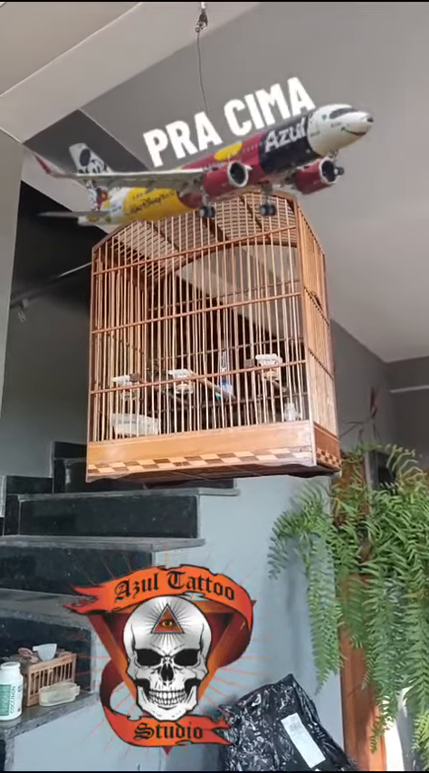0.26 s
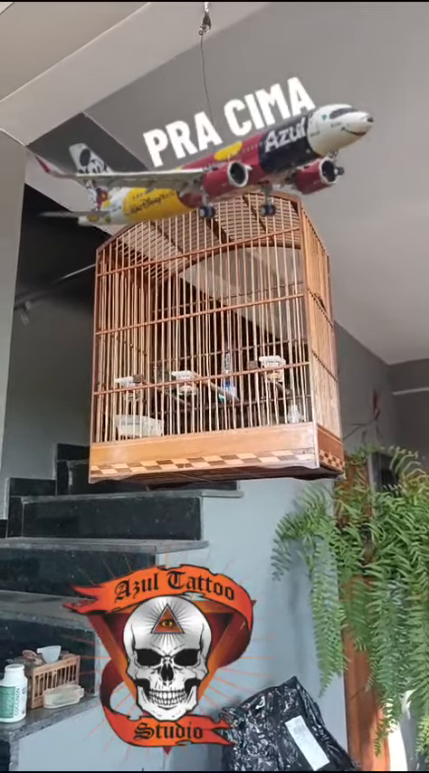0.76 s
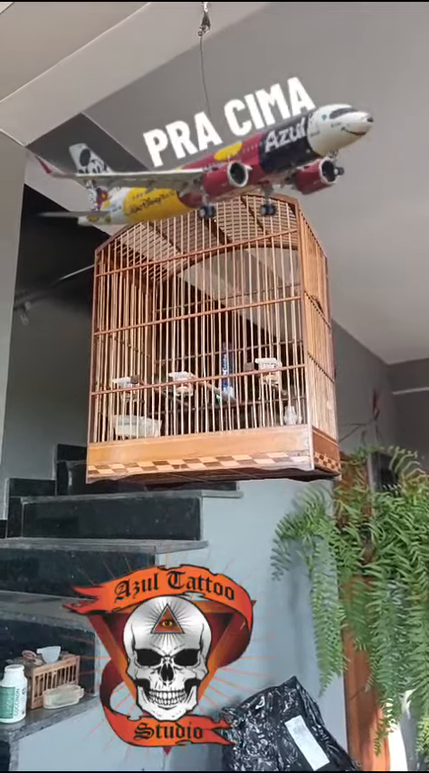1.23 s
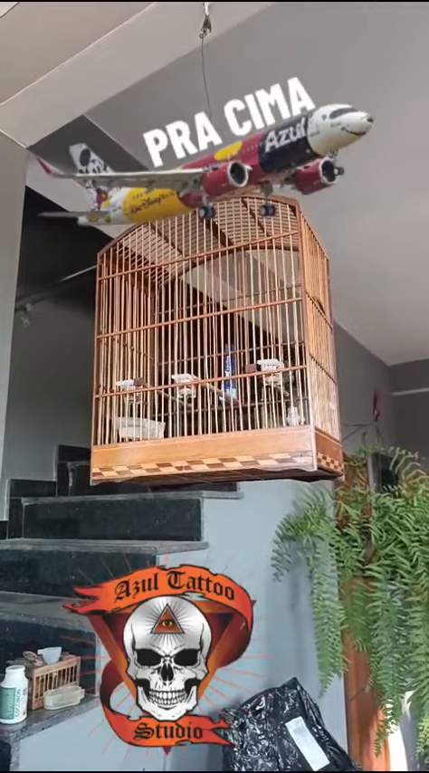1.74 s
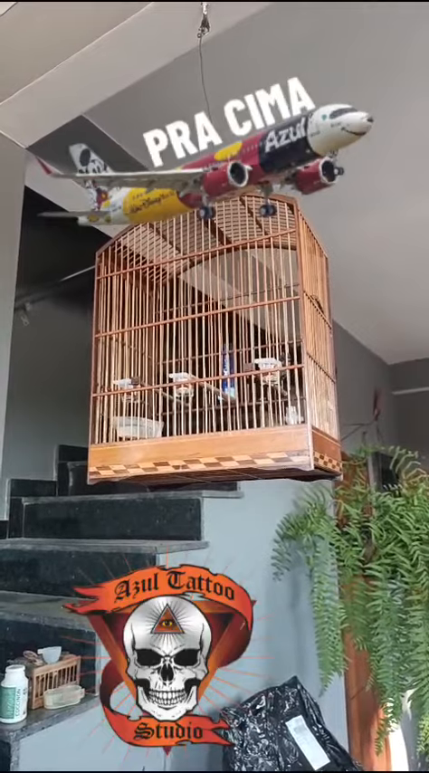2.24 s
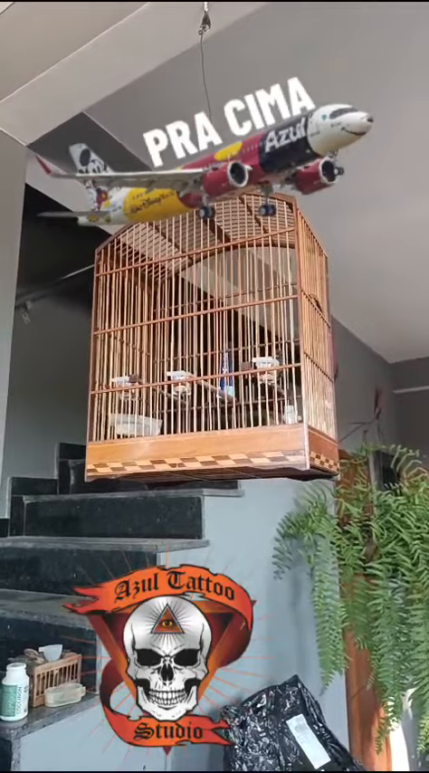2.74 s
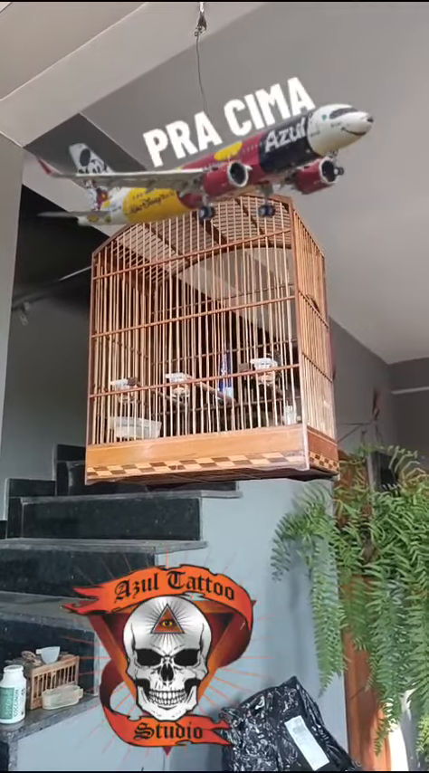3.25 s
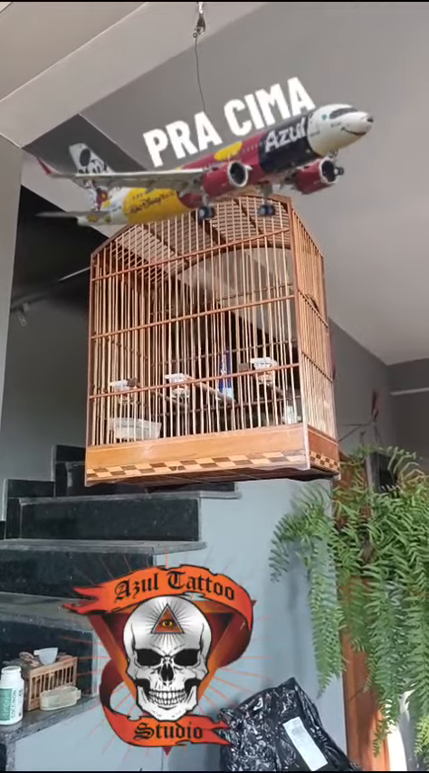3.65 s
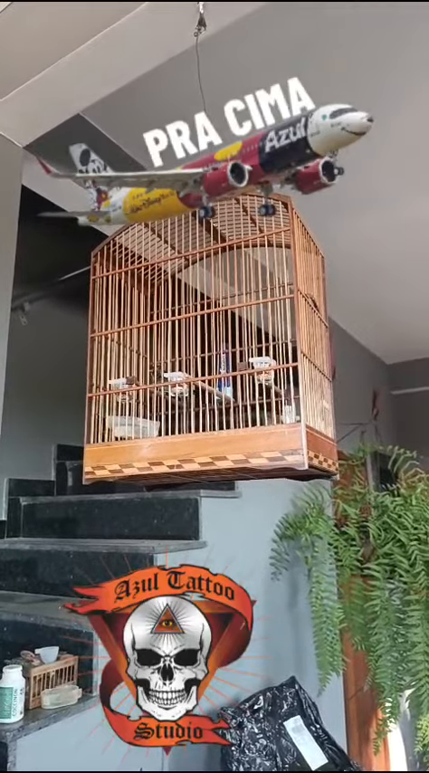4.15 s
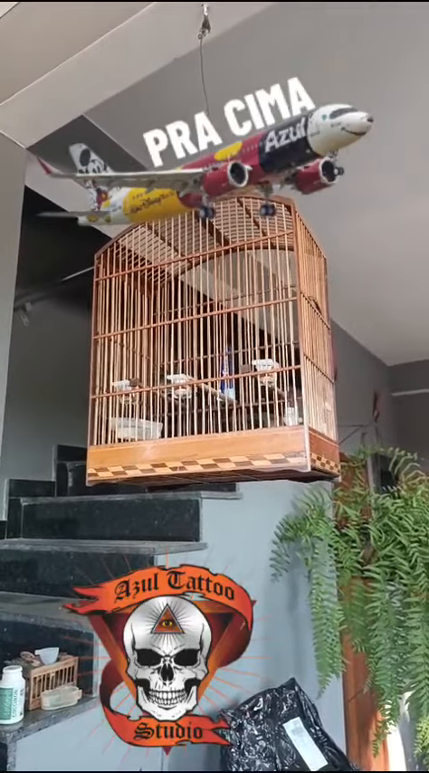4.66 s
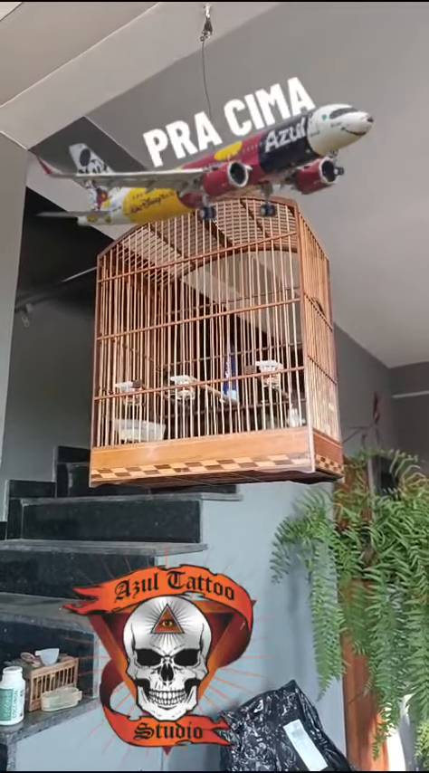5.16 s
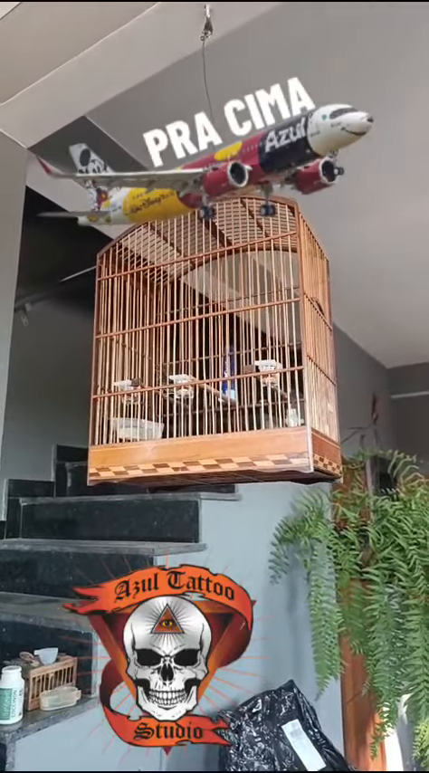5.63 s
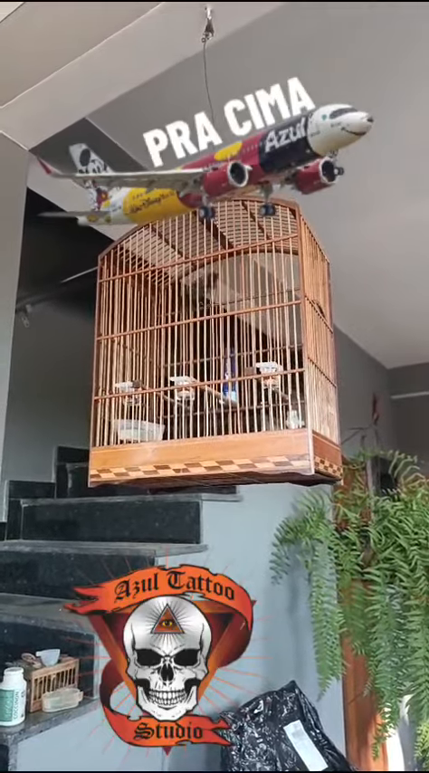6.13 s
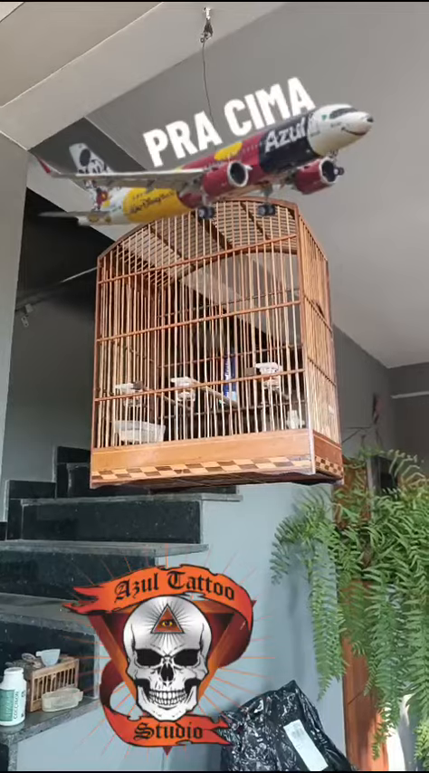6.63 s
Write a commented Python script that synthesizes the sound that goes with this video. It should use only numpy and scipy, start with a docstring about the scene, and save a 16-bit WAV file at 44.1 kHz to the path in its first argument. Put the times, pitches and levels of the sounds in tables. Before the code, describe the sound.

Indoors, a bird sings a high song three times, each ending in a quick pitch drop, with distant birds and low traffic behind.

```python
"""Caged bird in a hard room

A small bird sings three times: thin pips, quickening down-flicks, then a buzz of fast pitch sweeps that
narrows to a whistle and drops an octave, all from one nearly pure, gliding voice. The hard walls ring,
and an earlier song is still fading at the start. Other birds answer from further off, the cage ticks
as the bird hops, and outside the traffic hums with rumble, tyre wash and engine drones."""
import sys
import numpy as np
from scipy import signal
from scipy.fft import rfft, irfft, next_fast_len
from scipy.io import wavfile
from scipy.ndimage import map_coordinates

SR = 44100
rng = np.random.default_rng(int(sys.argv[2]) if len(sys.argv) > 2 else 0)


def to_wav(sig):
    """Store sig (one row per channel, or 1-D mono) as 16-bit WAV at the path in sys.argv[1].

    Samples outside -1..1 are clipped; the rate is SR.
    """
    pcm = np.clip(np.atleast_2d(sig), -1, 1) * 32767
    pcm = np.round(pcm).astype(np.int16)
    wavfile.write(sys.argv[1], SR, pcm.T)  # frames by channels


N = 303849

# fader moves of the traffic bed: (time [s], relative rumble level [dB], relative wash level [dB])
TRAFFIC_LEVELS = [(0.0, -49, -52), (0.5, -47.5, -55.5), (1.73, -54.5, -52.5), (2.09, -59, -54.5),
                  (3.07, -57, -56), (4.24, -54, -56.5), (4.81, -50, -53), (5.68, -55.5, -52.5),
                  (5.99, -52, -52.5), (6.89, -55, -49.5)]
# EQ of the traffic rumble and of the tyre wash: (frequency [Hz], gain [dB])
RUMBLE_EQ = [(25, -51.5), (38, -31), (48, -20), (60, -2.5), (75, -2.5), (110, 5), (175, 1), (240, -20),
             (400, -8.5), (700, -56)]
WASH_EQ = [(40, -6), (200, 10.5), (450, 3.5), (650, 3), (900, -3), (1600, -2.5), (2400, -6), (3500, -13),
           (5000, -22), (8000, -26.5), (12000, -34), (16000, -43.5)]
# engines: (start [s], end [s], first firing rate [Hz], last firing rate [Hz], level [dB])
ENGINES = [(-.5, 2.2, 68.46, 65.97, -47), (.7, 2.1, 57.5, 55, -57), (5.6, 7.2, 57.95, 60.5, -52.5)]
# harmonics of an engine: (multiple of the firing rate, level [dB])
ENGINE_HARMONICS = [(2, -2), (3, -5.5), (4, -14), (7, -17.5)]
# ring of the room: (frequency [Hz], time to fall 60 dB [s])
ROOM_DECAY = [(2000, 0.78), (4500, 0.7), (7500, 0.58), (10000, 0.4), (15000, 0.4)]
# first reflections off ceiling and walls: (delay [s], level [dB])
REFLECTIONS = [(.0045, -9.5), (0.0141, -4.5), (0.029, -5.5), (.056, -24)]
# strength of the straight path from the beak: (frequency [Hz], gain [dB])
BEAK_EQ = [(6000, -2.5), (8000, 1.5), (9500, 1.5), (15000, -2.5)]
# how each microphone hears birds and cage: (frequency [Hz], left gain [dB], right gain [dB])
MIC_EQ = [(2913, 1, 0.5), (4400, -2, 1.5), (6600, -4, 0.5), (7700, -7.5, 1), (9060, -7, 0.5),
          (12400, -5, -11), (13400, -2, -16), (14000, 11, 8), (15100, 5, 1.5)]
# feet and wings on the cage: (time [s], level [dB])
CAGE_TAPS = [(0.534, -63), (1.004, -59), (1.219, -76), (1.655, -43.5), (3.484, -44.5), (3.598, -44),
             (3.752, -41.5), (5.939, -53), (6.702, -46)]
# EQ of one tick: (frequency [Hz], gain [dB])
TICK_EQ = [(300, -7.5), (1500, 6), (4000, 4), (8000, -6), (15000, -8)]
# a far bird's chirps, all on one pitch: (time [s], level [dB])
FAR_CHIRPS = [(1.491, -60.5), (2.56, -52), (3.048, -54), (3.491, -52), (4.422, -51.5)]
# thin far whistles: (time [s], length [s], start pitch [Hz], end pitch [Hz], level [dB])
FAR_WHISTLES = [(2.995, 0.077, 5530, 4960, -55), (3.211, 0.1, 4050, 4510, -58),
                (3.327, 0.08, 4520, 4365, -54.5), (3.55, 0.05, 3710, 4150, -50),
                (4.333, 0.059, 4050, 3980, -42.5), (4.963, 0.047, 6540, 5010, -51)]
# far flourishes: (time of the drop [s], level [dB], time stretch [ratio], pitch [ratio])
FAR_SONGS = [(.605, -55.5, 1.13, 0.99), (1.432, -35, 1.4, 0.94), (4.234, -35.5, 1.3, 0.91),
             (4.766, -57, 0.92, 0.78)]
# U-shaped pips: (time [s], relative level [dB], lowest pitch [Hz], length [s])
PIPS = [(0.6995, -35, 9400, 0.012), (0.8698, -31, 9570, 0.022), (0.997, -36, 9490, 0.022),
        (1.141, -27.5, 9520, 0.016), (1.2164, -26.5, 9650, 0.02), (1.2944, -29.5, 9380, 0.02),
        (1.3668, -23.5, 9480, 0.0087), (1.457, -36.5, 8940, 0.019), (2.6996, -30.5, 9310, 0.0083),
        (2.9528, -29.5, 9530, 0.013), (3.0753, -27, 9640, 0.013), (3.2424, -29, 9490, 0.018),
        (3.401, -33.5, 9260, 0.015), (3.481, -37.5, 9050, 0.014), (5.098, -41, 9160, 0.0138),
        (5.3184, -36, 9450, 0.019), (5.422, -30, 9660, 0.015), (5.564, -31, 9660, 0.019),
        (5.671, -28, 9560, 0.014), (5.7935, -31.5, 9450, 0.014), (5.871, -32, 9430, 0.014)]
# a lone low flick under a pip: (time [s], level [dB])
LOW_FLICKS = [(0.999, -37.5), (3.074, -44.5)]
# runs of flicks: (start [s], end [s], first gap [s], gap over the one before [ratio], relative level [dB])
FLICK_RUNS = [(1.509, 1.78, .0535, .905, -33), (3.526, 3.71, .0475, .92, -31),
              (5.927, 6.16, .045, .975, -33.5)]
# three high flicks leading into the buzz: (time [s], level of the first [dB])
LEAD_INS = [(1.784, -21.5), (3.756, -25), (6.192, -25.5)]
# near flourishes: (time of the drop [s], level [dB], overtone level [dB], boost of the drop [dB])
NEAR_SONGS = [(-.032, -23, -15, 3.5), (1.976, -19.5, -14, 2.5), (3.952, -19, -15, 3),
              (6.386, -19.5, -15.5, 2)]

# the near bird's flourish (buzz, whistle, short shelf, plunge); far birds stretch and transpose it
BUZZ_CENTRE_HZ, BUZZ_DEPTH_HZ, SWEEPS_PER_S = 8250, 1510, 192.5
WHISTLE_HZ, WHISTLE_SAG_HZ_PER_S = 7750, 3000
SHELF_HZ, SHELF_RISE_HZ, PLUNGE_END_HZ, PLUNGE_CURVE = 6400, 550, 3800, .75
BUZZ_S, NARROW_S, WHISTLE_S, STEP_S, SHELF_S, PLUNGE_S = .114, .024, .062, .003, .014, .031
ATTACK_S, RELEASE_S, SWELL_DB_PER_S, SHELF_DB = .03, .015, 7.5, -2

FLICK_S, FLICK_TOP_HZ, FLICK_BOTTOM_HZ = .008, 10900, 8600
PRE_ROLL = SR // 2  # samples, so sounds can begin before time zero
TIME = np.arange(-PRE_ROLL, N + SR) / SR


def undb(db):
    """Decibels to gain."""
    return 10 ** (np.asarray(db) / 20)


def unit(x):
    """Scale to rms 1."""
    return x / np.sqrt(np.mean(x ** 2))


def eq(x, points):
    """Filter by (frequency [Hz], gain [dB]) points joined on a log axis."""
    hz, db = np.transpose(points)
    size = next_fast_len(x.shape[-1])
    f = np.maximum(np.fft.rfftfreq(size, 1 / SR), 1)
    gain = undb(np.interp(np.log(f), np.log(hz), db))
    return irfft(rfft(x, size) * gain, size)[..., :x.shape[-1]]


def wander(t, rate):
    """Smooth random modulation with a spread near 1."""
    return map_coordinates(rng.standard_normal(4096), [(t - t[0]) * rate], order=3, mode="wrap")


def ramp(t, start, length):
    """Rise from 0 to 1 over the given length."""
    return np.clip((t - start) / length, 0, 1)


def add(track, s, sound):
    """Mix a sound into the track at time s."""
    i = PRE_ROLL + int(s * SR)
    track[i:i + len(sound)] += sound


def outdoor_noise(spectrum, widen_hz=750):
    """Diffuse noise: alike at both microphones in the bass, wide in the treble."""
    mid, side = rng.standard_normal((2, len(TIME)))
    side_spectrum = [(hz, db - 10 * np.log10(1 + (widen_hz / hz) ** 2)) for hz, db in spectrum]
    return unit(eq(mid, spectrum) + eq(side, side_spectrum) * np.array([[1], [-1]]))


def traffic_bed(rumble_trim_db=-1.5, wash_trim_db=3):
    """Low traffic rumble and tyre wash, each slowly swelling and ebbing."""
    times, *levels = np.transpose(TRAFFIC_LEVELS)
    rumble_db, wash_db = (np.interp(TIME, times, db) for db in levels)
    rumble = outdoor_noise(RUMBLE_EQ) * undb(rumble_db + rumble_trim_db)
    wash = outdoor_noise(WASH_EQ) * undb(wash_db + wash_trim_db + .5 * wander(TIME, 2.2))
    return rumble + wash


def engine_drones():
    """Engines fade in and out, each a stack of wavering harmonics of its drifting firing rate."""
    out = np.zeros(len(TIME))
    for start, end, first_hz, last_hz, db in ENGINES:
        t = np.arange(int((end - start) * SR)) / SR
        firing_hz = np.linspace(first_hz, last_hz, len(t)) * (1 + .01 * wander(t, 18))
        phase = 2 * np.pi * np.cumsum(firing_hz) / SR
        tone = sum(np.sin(k * phase) * undb(harmonic_db + 2.5 * wander(t, 14))
                   for k, harmonic_db in ENGINE_HARMONICS)
        add(out, start, np.sqrt(2) * undb(db) * tone * signal.windows.tukey(len(t), .3))
    return out


def room_tail(build_s):
    """Diffuse ring of the room for one microphone; the treble dies first."""
    t = np.arange(SR) / SR
    hz, t60 = np.transpose(ROOM_DECAY)
    noise, f = rfft(rng.standard_normal(SR)), np.fft.rfftfreq(SR, 1 / SR)
    bands = (irfft(noise * np.interp(f, hz, share)) for share in np.eye(len(hz)))
    tail = sum(band * np.exp(-np.log(1000) * t / decay) for band, decay in zip(bands, t60))
    tail *= 1 - np.exp(-t / build_s)
    return tail / np.sqrt(np.sum(tail ** 2))


def through_bars(smear_s=.001, grain_hz=450):
    """All-pass smear on the way out of the cage: each pitch is held up a little differently."""
    f = np.fft.rfftfreq(SR, 1 / SR)
    delay = smear_s * (.5 + np.abs(1 + wander(f, 1 / grain_hz)))
    return irfft(np.exp(-2j * np.pi * np.cumsum(delay) * f[1]))


def room(near, far, mic, tail_db=2.5, far_direct_db=-15):
    """Near sounds arrive through the bars, off the walls and as a ring; far birds mostly as a ring."""
    direct = eq(through_bars(), BEAK_EQ) * (np.arange(SR) < SR / 20)
    response = direct + undb(tail_db) * room_tail(build_s=.012)
    for delay, db in REFLECTIONS:
        mic_offset_s = rng.uniform(-.00047, .00043)
        response[int((delay + mic_offset_s) * SR)] += undb(db)
    heard = signal.fftconvolve(near, response) + signal.fftconvolve(far, room_tail(build_s=.022))
    heard = heard[:len(TIME)] + undb(far_direct_db) * far
    return eq(heard, np.array(MIC_EQ)[:, [0, 1 + mic]])


def cage_ticks(decay_s=.0061):
    """Feet and wings strike bars and perches: tiny, fast-dying bursts of noise."""
    out, t = np.zeros(len(TIME)), np.arange(SR // 20) / SR
    for s, db in CAGE_TAPS:
        noise = unit(eq(rng.standard_normal(len(t)), TICK_EQ))
        add(out, s, undb(db) * noise * np.exp(-t / decay_s))
    return out


def syrinx(hz, overtone_db=-40):
    """The bird's voice: a nearly pure tone whose octave escapes the beak over only part of the range."""
    phase = 2 * np.pi * np.cumsum(hz) / SR
    octave_gain = undb(overtone_db) * np.interp(hz, [5300, 6100, 8200, 8800], [.1, 1, 1, 0])
    return np.sqrt(2) * (np.sin(phase) + octave_gain * np.sin(2 * phase))


def note(hz, db):
    """A short tone that swells and fades along a pitch path."""
    return undb(db) * syrinx(hz) * np.sin(np.linspace(0, np.pi, len(hz)))


def warble(length, start_hz, end_hz, db, depth_hz, rate_hz=75):
    """A held or gliding whistle with a quick, uneven vibrato."""
    t = np.arange(int(length * SR)) / SR
    vibrato = np.sin(2 * np.pi * rate_hz * t) + .76 * wander(t, 200)
    return note(np.linspace(start_hz, end_hz, len(t)) + depth_hz * vibrato, db)


def far_birds(chirp_hz=3100):
    """Other cages answer with the same flourish pitched lower, plus soft chirps and whistles."""
    out = np.zeros(len(TIME))
    for s, db, stretch, pitch in FAR_SONGS:
        start, sound = flourish(overtone_db=-26, drop_db=4, stretch=stretch, pitch=pitch,
                                whistle_db=-5, vibrato_hz=600, rasp_db=-31)
        add(out, s + start, undb(db) * sound)
    for s, db in FAR_CHIRPS:
        add(out, s, warble(length=.094, start_hz=chirp_hz, end_hz=chirp_hz, db=db, depth_hz=243))
    for s, length, start_hz, end_hz, db in FAR_WHISTLES:
        add(out, s, warble(length, start_hz, end_hz, db, depth_hz=60.3))
    return out


def pip(low_hz, length, db, fall_hz=960, rise_hz_per_s=190000, snap_hz=1800, snap_s=.00027):
    """Snaps on from above, dips to its lowest pitch and turns up again; longer pips climb further."""
    t = np.arange(int(length * SR)) / SR
    position = 2 * t / length - 1  # -1 to 1, with the bottom of the U at 0
    arm_hz = np.where(position < 0, fall_hz, rise_hz_per_s * length / 2)
    hz = low_hz + arm_hz * position ** 2 + snap_hz * np.exp(-t / snap_s)
    envelope = np.sin(np.pi * t / length) + .3 * np.clip(-position, 0, 1)  # extra bite up front
    fades = ramp(t, 0, .001) * ramp(-t, -length, .002)
    return undb(db) * syrinx(hz) * envelope * fades


def flick(top_hz, bottom_hz, db):
    """A very quick fall in pitch that slows near the bottom."""
    remaining = np.linspace(1, 0, int(FLICK_S * SR))
    return note(bottom_hz + (top_hz - bottom_hz) * remaining ** 1.76, db)


def flick_runs(climb_hz_per_s=6200, swell_db_per_s=24, trim_db=-1, scatter_db=.4):
    """Runs of down-flicks that quicken and swell, each flick starting higher than the last."""
    out = np.zeros(len(TIME))
    for start, end, gap, gap_ratio, db in FLICK_RUNS:
        t = 0
        while start + t < end:
            level_db = db + trim_db + swell_db_per_s * t - scatter_db * rng.standard_normal()
            add(out, start + t, flick(FLICK_TOP_HZ + climb_hz_per_s * t, FLICK_BOTTOM_HZ, level_db))
            t += gap
            gap = max(gap * gap_ratio, FLICK_S)
    return out


def flourish(overtone_db, drop_db, stretch=1, pitch=1, whistle_db=-2, vibrato_hz=260, rasp_db=-23,
             waver_hz=80, flutter_db=2):
    """Fast up-sweeps narrow to a whistle that steps down and plunges; returns start offset and sound."""
    start, end = -BUZZ_S - WHISTLE_S, SHELF_S + PLUNGE_S
    t = np.arange(start, end, 1 / (SR * stretch))  # zero is the drop
    # crossfades between the stages
    buzzing = 1 - ramp(t, -WHISTLE_S - NARROW_S / 2, NARROW_S)
    dropped = ramp(t, -STEP_S / 2, STEP_S)
    whistling = 1 - buzzing - dropped
    plunged = ramp(t, SHELF_S, PLUNGE_S)

    whistle_hz = WHISTLE_HZ - WHISTLE_SAG_HZ_PER_S * t
    shelf_hz = SHELF_HZ + SHELF_RISE_HZ * (ramp(t, 0, SHELF_S) - .5)
    plunge_hz = shelf_hz * (PLUNGE_END_HZ / shelf_hz) ** (plunged ** PLUNGE_CURVE)
    centre_hz = buzzing * BUZZ_CENTRE_HZ + whistling * whistle_hz + dropped * plunge_hz
    # the pitch climbs slowly and snaps back fast, each sweep a little wider or narrower
    sweep_phase = 2 * np.pi * np.cumsum(SWEEPS_PER_S * (1 + .03 * wander(t, 60))) / SR
    sweep = np.sin(sweep_phase - .5 * np.sin(sweep_phase)) * (1 + .099 * wander(t, 200))
    depth_hz = buzzing * BUZZ_DEPTH_HZ + whistling * vibrato_hz
    hz = pitch * (centre_hz + depth_hz * sweep + waver_hz * wander(t, 250))
    # the tone thins while the pitch snaps back, and the buzz carries a little rasp
    gate = 1 - .6 * buzzing * np.sin(sweep_phase / 2) ** 4
    rasp = undb(rasp_db) * buzzing * wander(t, 4600) * syrinx(np.full(len(t), 11500 * pitch))

    envelope = ramp(t, start, ATTACK_S) * (1 - ramp(t, end - RELEASE_S, RELEASE_S))
    db = SWELL_DB_PER_S * t + whistle_db * whistling
    db += (drop_db + SHELF_DB * (1 - plunged)) * dropped
    db += flutter_db * (1 - dropped) * wander(t, 90)
    return start * stretch, (syrinx(hz, overtone_db) + rasp) * gate * envelope * undb(db)


def near_bird(pip_early_s=.0012, pip_trim_db=-1, lead_in_gap_s=.0105):
    """The lead voice: pips, a run of flicks, three lead-in flicks, then the flourish."""
    out = flick_runs()
    for s, db, low_hz, length in PIPS:
        add(out, s - pip_early_s, pip(low_hz, length, db + pip_trim_db))
    for s, db in LOW_FLICKS:
        add(out, s, flick(FLICK_TOP_HZ, bottom_hz=8170, db=db))
    for s, db in LEAD_INS:
        for k in range(3):  # each starts lower and is softer than the last
            add(out, s + k * lead_in_gap_s, flick(top_hz=12800 - 900 * k, bottom_hz=9200, db=db - 2 * k))
    for s, db, overtone_db, drop_db in NEAR_SONGS:
        start, sound = flourish(overtone_db, drop_db)
        add(out, s + start, undb(db) * sound)
    return out


def scene():
    """Birds and cage through the room to each microphone, over the street."""
    near, far = near_bird() + cage_ticks(), far_birds()
    indoors = np.array([room(near, far, mic) for mic in (0, 1)])
    street = traffic_bed() + engine_drones()
    return (indoors + street)[:, PRE_ROLL:PRE_ROLL + N]


def record(dry):
    """A steep low-pass shaves off the very top."""
    top_hz = 15950
    return signal.sosfilt(signal.ellip(10, .2, 80, top_hz, fs=SR, output="sos"), dry)


dry = scene()
out = record(dry)
to_wav(out)
```